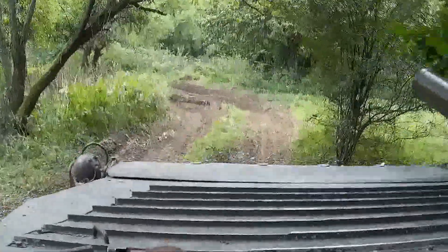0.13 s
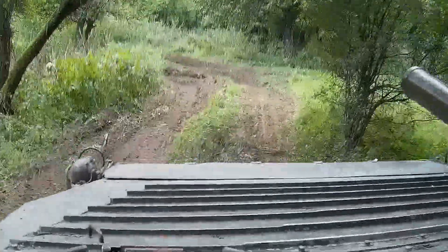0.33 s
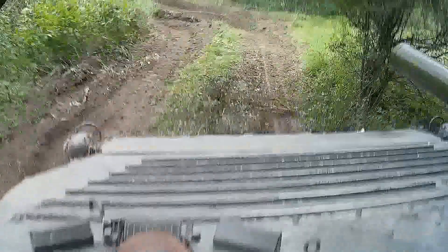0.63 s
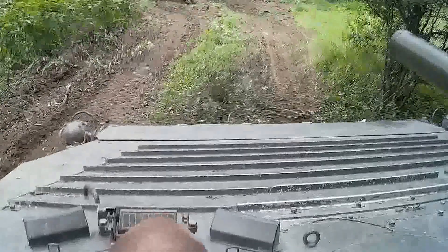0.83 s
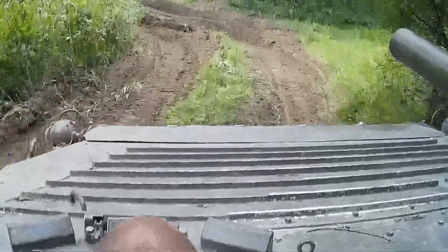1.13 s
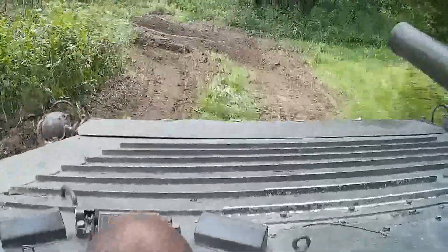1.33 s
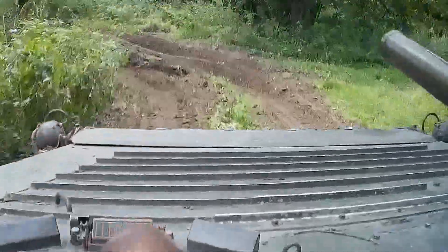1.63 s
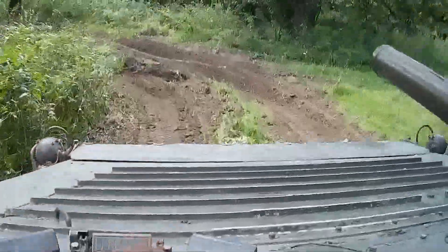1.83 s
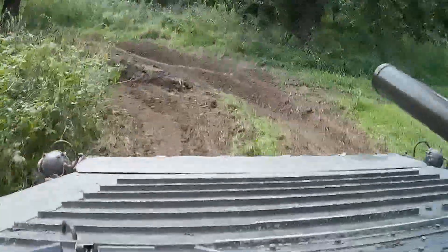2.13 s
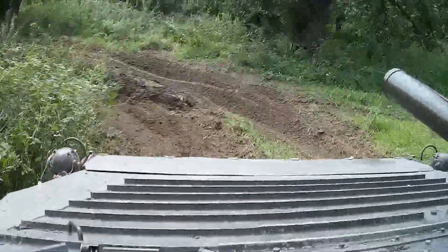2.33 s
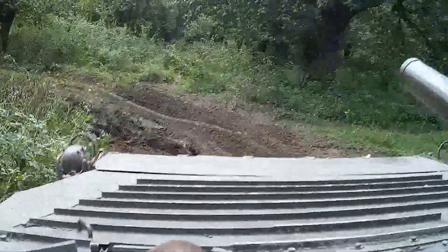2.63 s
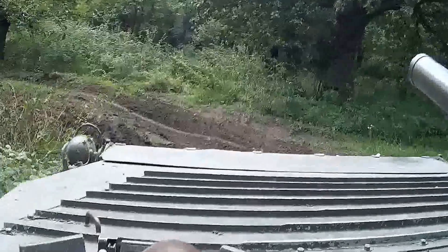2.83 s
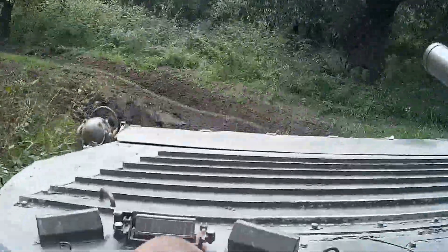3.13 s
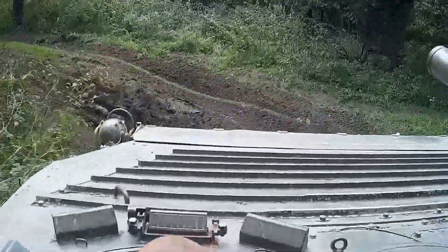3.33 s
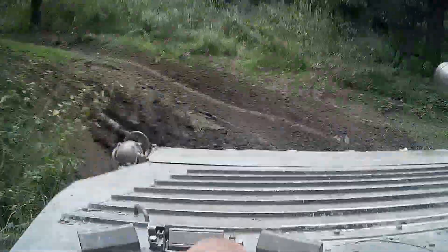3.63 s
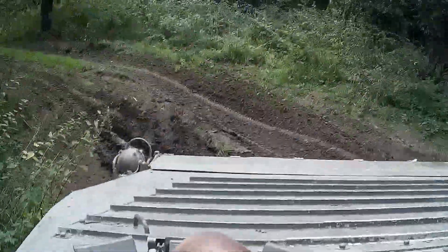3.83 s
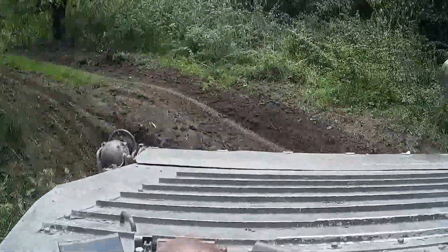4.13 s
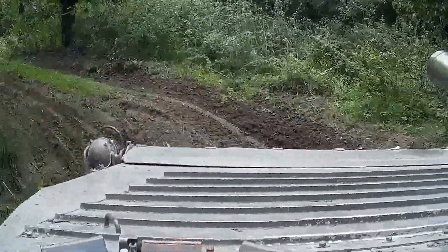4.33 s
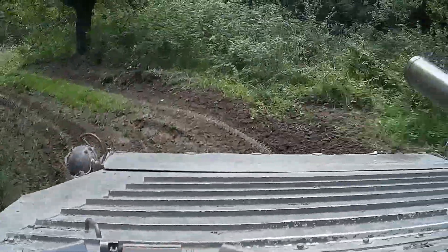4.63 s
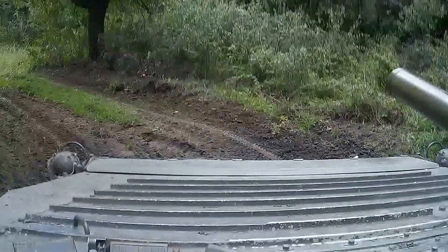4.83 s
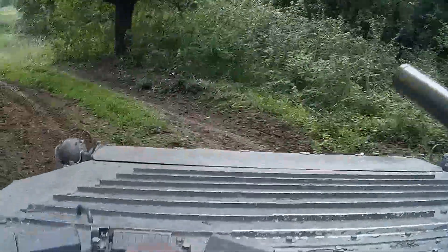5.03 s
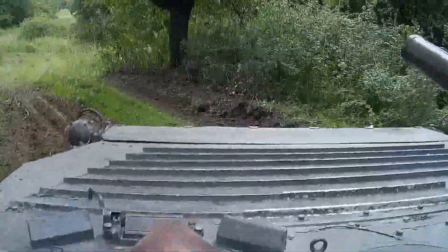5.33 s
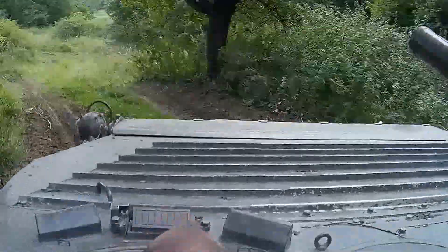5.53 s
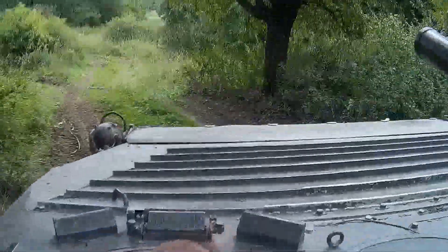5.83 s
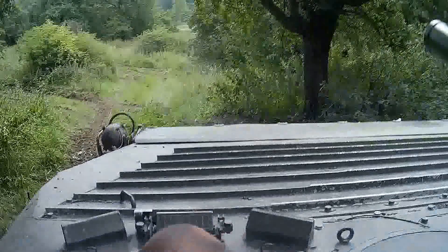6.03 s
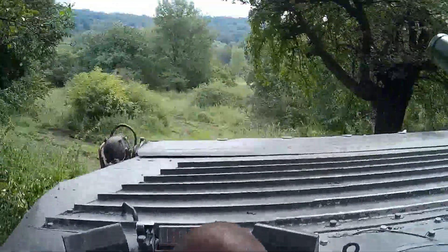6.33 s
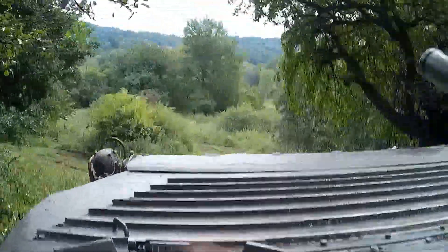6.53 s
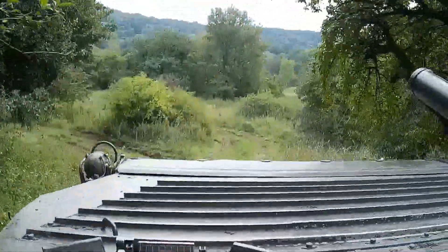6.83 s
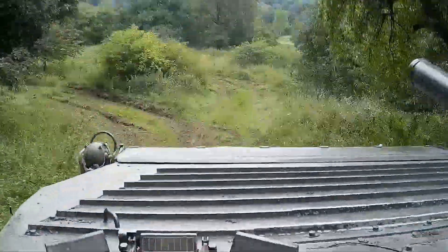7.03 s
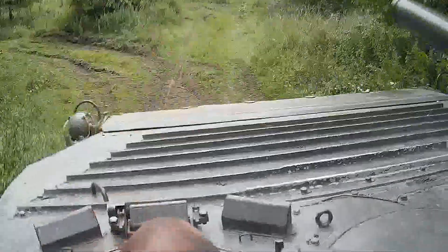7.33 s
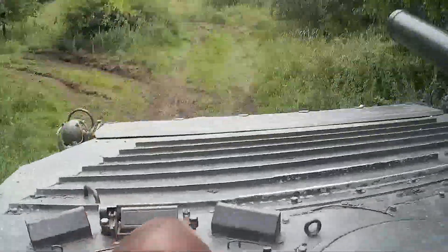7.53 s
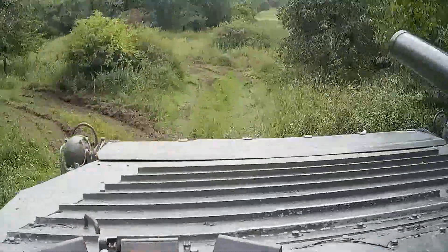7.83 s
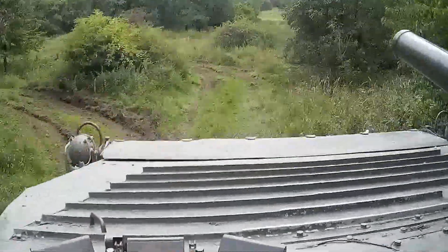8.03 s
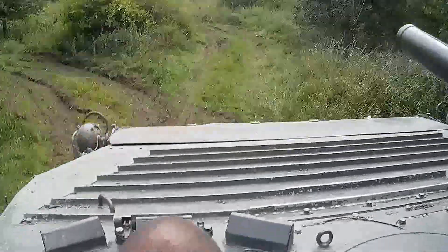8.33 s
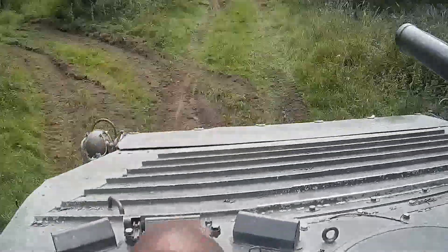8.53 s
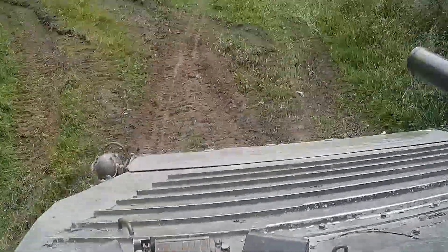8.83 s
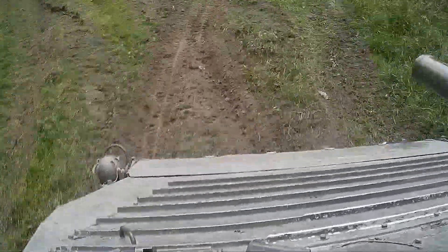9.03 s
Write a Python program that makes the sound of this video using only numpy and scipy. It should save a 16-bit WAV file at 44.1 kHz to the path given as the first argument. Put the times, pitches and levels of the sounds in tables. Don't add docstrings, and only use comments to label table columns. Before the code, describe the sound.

An outdoor ride with the microphone fixed on a heavy vehicle's steel hull. Steady diesel firing, plate drone and fast metallic chatter run throughout, with low track and wind rumble beneath. Bright metal ticks and a few dull knocks come irregularly. After the middle the loose metal slams in dense bursts; a big bump follows, then lighter rattling with clinks and repeated blunt thumps that briefly duck the sound.

```python
import sys
import numpy as np
from scipy import signal
from scipy.fft import rfft, irfft
from scipy.io import wavfile
from scipy.ndimage import uniform_filter1d

SR = 44100
rng = np.random.default_rng(int(sys.argv[2]) if len(sys.argv) > 2 else 0)


def output_pcm(signal):
    pcm = np.clip(np.atleast_2d(signal).T, -1, 1) * 32767
    wavfile.write(sys.argv[1], SR, np.round(pcm).astype(np.int16))


def invert_db(x):
    u = np.asarray(x, float) / 20
    return 10 ** u


N = 405279


def rms_one(x):
    return x / np.sqrt(np.mean(x ** 2) + 1e-20)


def in_time(rows):
    s, *columns = np.transpose(rows)
    return [np.interp(np.arange(N) / SR, s, c) for c in columns]


def spectrum_db(hz, rows):
    table_hz, table_db = np.transpose(rows)
    return np.interp(np.log(hz), np.log(table_hz), table_db)


def resonance_db(hz, centre_hz, width_hz, top_db):
    return top_db / (1 + (2 * (hz - centre_hz) / width_hz) ** 2)


def bump(s, ms):
    out = np.zeros(N)
    first, last = int((s - ms / 200) * SR), int((s + ms / 200) * SR)
    near = np.arange(max(first, 0), min(last, N))
    out[near] = np.exp(-.5 * ((near / SR - s) * 1000 / ms) ** 2)
    return out


def drift(rate_hz):
    step = 40
    r = np.exp(-2 * np.pi * step * rate_hz / SR)
    noise = rng.standard_normal(N // step + 2002)
    slow = signal.lfilter([1], [1, -2 * r, r * r], noise)[2000:]
    return np.interp(np.arange(N) / step, np.arange(len(slow)), rms_one(slow))


def colour(x, spectrum, peaks=()):
    size = 2 ** 15
    hz = np.maximum(np.arange(size // 2 + 1) * SR / size, 1)
    db = spectrum_db(hz, spectrum) + sum(resonance_db(hz, *peak) for peak in peaks)
    cepstrum = irfft(db * np.log(10) / 20, size)
    cepstrum[1:size // 2] *= 2
    cepstrum[size // 2 + 1:] = 0
    response = irfft(np.exp(rfft(cepstrum)), size)
    return rms_one(signal.fftconvolve(x, response)[:N])


def highpass(x, order, hz):
    return signal.sosfilt(signal.butter(order, hz, "high", fs=SR, output="sos"), x)


def ring(seconds, sizes, hz, t60_s):
    clicks = np.full(N, 1e-18)
    np.add.at(clicks, (seconds * SR).astype(int), sizes)
    r, w = invert_db(-60 / (t60_s * SR)), 2 * np.pi * hz / SR
    return signal.lfilter([0, np.sin(w)], [1, -2 * r * np.cos(w), r * r], clicks)


# time_s, turns_per_s
CRANK_SPEED = [(0.0, 28.23), (0.528, 27.89), (0.762, 31.83), (1.235, 35.38), (1.684, 30.44), (2.703, 31.66),
               (2.955, 27.1), (3.469, 27.41), (3.6, 32.3), (4.3, 30.75), (4.812, 30.67), (5.269, 36.05),
               (5.711, 32.43), (6.274, 36.11), (6.714, 26.25), (7.2, 24.61), (7.39, 30.9), (9.19, 32.48)]


def crank_speed():
    flywheel_s = .16
    return uniform_filter1d(in_time(CRANK_SPEED)[0], size=int(flywheel_s * SR), mode="nearest")


# start_s, length_s, sharpness_db
PULLS = [(0, 0.67, -30), (1.764, 0.21, -32.5), (2.787, 0.74, -31), (3.62, 0.55, -39), (4.227, 0.77, -29.5),
         (5.04, 0.34, -34.5), (5.513, 0.504, -30), (5.974, 0.6, -36), (6.423, 0.25, -29),
         (6.99, 0.4, -34.5), (7.5, 1.2, -42)]


def pulling():
    edge_s, coast_db = 0.039, -50.5
    t = np.arange(N) / SR

    def held(s, length_s):
        inside_s = np.minimum(t - s, s + length_s - t)
        return np.clip(inside_s / edge_s + .5, 0, 1)

    return coast_db + np.max([held(s, length_s) * (db - coast_db) for s, length_s, db in PULLS], axis=0)


# time_s, chatter_db
SHAKING = [(0, -36.5), (1.2, -35.5), (2.8, -38), (3.2, -36.5), (4.2, -37.5), (4.7, -32), (4.95, -30),
           (5.4, -34.5), (5.7, -24.5), (6.05, -31.5), (6.4, -32.5), (6.55, -23.5), (6.9, -27.5),
           (7.15, -25.5), (7.3, -34.5), (7.75, -35.5), (8.6, -41.5), (9.19, -33)]


def shaking():
    return in_time(SHAKING)[0]


# time_s, level_db
SWAY_LEVEL = [(0, -43), (1.3, -37.5), (3.7, -38), (5.4, -50), (6.7, -30.5), (7.5, -41.5), (8.1, -26),
              (8.75, -52), (9.19, -38)]
# time_s, level_db
RUMBLE_LEVEL = [(0, -26), (1.3, -30), (2.6, -26.5), (3.2, -31), (4, -22), (4.6, -29), (6.3, -22), (6.8, -28.5),
                (7.2, -31), (7.33, -12), (7.45, -30), (8.6, -30.5), (8.8, -25.5), (9.0, -30), (9.19, -25)]
# freq_hz, density_db_per_hz
SWAY_SPECTRUM = [(6, -46), (12, -10), (20, -12), (35, -4), (50, -1.5), (80, -37), (250, -57), (3000, -110)]
# freq_hz, density_db_per_hz
RUMBLE_SPECTRUM = [(24, -34), (40, -12.5), (64, -3), (91, -11), (123, -9), (156, -18.5), (450, -32),
                   (500, -54), (650, -72), (1100, -120)]
# freq_hz, width_hz, lift_db
TRACK_HUM = [(57.5, 11, 6)]


def running_gear():
    sway_db, = in_time(SWAY_LEVEL)
    track_db, = in_time(RUMBLE_LEVEL)
    sway = colour(rng.standard_normal(N) * invert_db(4 * drift(8)), SWAY_SPECTRUM)
    rumble = colour(rng.standard_normal(N) * invert_db(1.3 * drift(12.0)), RUMBLE_SPECTRUM, TRACK_HUM)
    rumble_db = track_db - 0.3 * (pulling() + 32.5) - 4.5
    return invert_db(sway_db + 5.5) * sway + invert_db(rumble_db) * rumble


# freq_hz, density_db_per_hz
SIZZLE_SPECTRUM = [(2500, -35), (3800, -3), (4600, 3), (6000, 12), (8000, -3), (9500, -7), (11000, -21),
                   (16000, -45)]
# freq_hz, width_hz, lift_db
SIZZLE_RINGS = [(3600, 500, 11), (5940, 370, -8)]


def sizzle():
    sizes = invert_db(1.5 * np.minimum(rng.exponential(1, N), 5))
    grains = sizes * rng.standard_normal(N) * invert_db(1.5 * drift(40))
    level_db = -39.5 + 1.92 * (shaking() + 31.5)
    return invert_db(level_db) * colour(grains, SIZZLE_SPECTRUM, SIZZLE_RINGS)


# start_s, peak_db, contact_sharpness_hz
KNOCKS = [(2.907, -20, 330), (2.9165, -22.5, 1000), (3.586, -22.5, 1100), (3.589, -24, 450),
          (3.654, -32, 900), (7.2292, -26.5, 2000), (7.2285, -17, 330), (8.3261, -30.5, 2200),
          (8.8, -27, 2200), (8.891, -25.5, 1510), (9.072, -26.5, 1000)]
# freq_hz, level_db, t60_s
KNOCK_MODES = [(215, -2, 0.023), (279, 0.5, 0.091), (327, 5.5, 0.03), (384, -2.5, .02), (470, 5, 0.0075),
               (603, -5, 0.01), (820, 12.5, 0.031), (1130, 5, 0.046), (1490, 19, 0.021), (1725, 15, 0.024),
               (2100, -4, .01)]


def knocks():
    s, db, contact_hz = np.transpose(KNOCKS)
    luck = rng.standard_normal((len(s), len(KNOCK_MODES)))
    out = np.zeros(N)
    for k, (hz, mode_db, t60_s) in enumerate(KNOCK_MODES):
        reach = np.minimum(3 * hz / contact_hz, 1) / (1 + (hz / contact_hz) ** 2)
        out -= ring(s, invert_db(db + mode_db - 3.5 + 0.65 * luck[:, k]) * reach, hz, t60_s)
    return out


# centre_s, level_db, width_ms, direction
JOLTS = [(.6, -16, 9.0, 1), (3.595, -14, 6.0, 1), (5.95, -13, 8.0, 1), (6.21, -15, 4.0, 1),
         (6.75, -14, 7.0, 1), (7.267, -4, 3.5, 1), (7.281, -7, 4.0, -1), (7.292, -4, 5.0, -1),
         (8.275, -18, 5.0, 1), (8.31, -12, 4.0, 1), (8.32, -14, 3.0, -1), (8.762, -7, 4.5, 1),
         (8.772, -9, 3.5, -1), (8.785, -16, 4.0, 1), (8.797, -5, 6.0, -1), (8.871, -6, 5.0, -1),
         (8.881, -7, 3.5, 1), (8.893, -4, 6.0, -1), (8.96, -15, 4.0, 1), (8.972, -7, 4.0, -1),
         (8.985, -9, 5.0, -1), (9.0705, 2, 2.8, 1), (9.084, -1, 5.0, -1), (9.136, -9, 4.0, 1),
         (9.146, -12, 5.0, -1)]


def jolts():
    push = sum(way * invert_db(db) * bump(s, ms) for s, db, ms, way in JOLTS)
    return highpass(push, 1, 8)


# start_s, peak_db
CRACKS = [(0.165, -33), (0.3207, -31), (0.6464, -22), (0.6744, -24), (3.1018, -32), (3.5848, -32),
          (3.6701, -23), (3.7065, -38), (4.2383, -26), (4.3326, -34), (4.4034, -35), (4.6974, -35),
          (6.0097, -32), (6.3086, -29), (6.6458, -24), (7.2275, -22), (7.816, -19), (7.8655, -35),
          (7.9773, -42), (8.1873, -44), (8.4906, -41), (8.8074, -32)]


def cracks():
    s, db = np.transpose(CRACKS)
    return highpass(ring(s, invert_db(db + 11.5), hz=11300, t60_s=0.0015), 2, 9000)


STOPS_HZ = [
    3680,
    4660,
    5030,
    5600,
]
# start_s, peak_db
FOOT_TICKS = [(.1165, -15), (.1605, -25), (.1962, -17), (.3215, -18), (.6753, -7.5), (3.074, -20),
              (3.1127, -13.5), (3.581, -30), (3.5838, -13), (3.6042, -17), (3.6441, -17), (4.4716, -18),
              (6.0023, -22), (6.1492, -19.5), (7.9232, -20), (8.0133, -28), (8.1199, -27), (8.2011, -18),
              (8.2846, -19), (8.4227, -24), (8.5351, -25), (8.7716, -20)]
SIDE_TICKS = [(.2346, -26), (2.465, -23), (3.0025, -25), (3.12, -15), (4.6981, -12), (6.309, -10),
              (6.3948, -18), (7.3094, -13.5), (7.424, -14.5), (7.8161, -6.5), (8.1383, -16.5),
              (8.1987, -20), (8.3603, -24), (8.808, -9.5), (9.086, -19), (0.2776, -25), (1.7578, -30),
              (1.9232, -30), (3.1292, -24), (3.6653, -26), (3.6967, -25), (5.314, -25), (4.545, -20),
              (4.638, -24.5), (4.6596, -28), (4.6745, -23), (4.82, -21), (4.9172, -29), (4.9476, -25),
              (4.4108, -29), (4.5253, -28), (3.5128, -40), (3.504, -28), (6.242, -26), (6.385, -27),
              (6.491, -18), (6.9053, -24), (7.7275, -24), (8.0932, -35), (7.8212, -21), (7.8805, -19),
              (8.3506, -22)]
FACE_TICKS = [(0.28, -25), (0.647, -10), (2.9464, -17.5), (3.1024, -17), (3.6482, -16), (3.6607, -11.5),
              (3.6709, -11.5), (3.707, -16), (4.239, -14), (4.333, -15), (4.7265, -19.5), (4.8713, -20),
              (4.878, -18.5), (6.011, -12.5), (6.2564, -17.5), (6.7835, -17), (7.277, -10), (7.3142, -16),
              (7.787, -24), (7.7947, -19.5), (7.8664, -10.5), (7.891, -25), (7.964, -20), (7.978, -12),
              (8.059, -15.5), (8.1547, -21), (8.188, -13.5), (8.2297, -21), (8.3364, -16), (8.4917, -11.5),
              (8.7104, -15.5)]
TIP_TICKS = [(.0061, -27.5), (0.0992, -21), (0.1295, -14.5), (0.166, -21), (0.2105, -24.5), (0.2542, -19),
             (0.2615, -21), (0.288, -14), (0.7765, -29), (1.2672, -25), (1.2771, -27), (1.2871, -23),
             (1.6784, -24), (2.3236, -25), (2.9656, -23), (4.2455, -18), (4.2724, -22), (4.296, -24),
             (4.3417, -24), (4.4041, -13.5), (5.6538, -16), (5.74, -13), (5.9695, -20), (6.0243, -13),
             (6.6227, -23), (8.3044, -25), (8.7992, -17), (8.8916, -28), (9.0756, -14.5)]
# freq_hz, level_db, t60_s
FITTING_MODES = [(3880, -6.5, 0.011), (4410, 0.5, 0.0048), (4700, -46, 0.013), (5273, -8, 0.016),
                 (5330, -7, 0.013), (6640, -4, 0.011), (7690, 4.5, 0.003), (8760, -1.5, 0.0065)]


def ticks():
    tables = FOOT_TICKS, SIDE_TICKS, FACE_TICKS, TIP_TICKS
    events = [(s, db, hz) for hz, rows in zip(STOPS_HZ, tables) for s, db in rows]
    s, db, stop_hz = np.transpose(events)
    luck = rng.standard_normal((len(s), len(FITTING_MODES) + 2))
    out = np.zeros(N)
    for k, (mode_hz, mode_db, t60_s) in enumerate(FITTING_MODES):
        near_db = -15 * np.abs(np.log2(mode_hz / stop_hz)) + 2.0 * luck[:, k]
        sizes = invert_db(db + mode_db + near_db + 9.0) * (-1) ** k
        out += ring(s + .00015 * np.abs(luck[:, k + 1]), sizes, mode_hz, t60_s)
        wobble_s = .0013 * (1 + .3 * np.tanh(luck[:, k]))
        out += ring(s + wobble_s, .35 * sizes * np.sign(luck[:, k + 1]), mode_hz, t60_s)
        out += ring(s + 0.0052, 0.14 * sizes, mode_hz, t60_s)
    out = signal.sosfilt(signal.butter(4, 10000, fs=SR, output="sos"), out)
    edge_db = db - 17.5 + 0.4 * (db + 11) + 1.5 * luck[:, -1]
    out += ring(s, invert_db(edge_db), 10040, 0.004)
    return highpass(out, 4, 3300)


# centre_s, length_s
CHANGEOVERS = [
    (.62, .2),
    (2.92, .3),
]


def beat(turns, sharpness, spread_db, second):
    luck = rng.standard_normal((400, 3))[np.floor(turns + .25).astype(int)]
    angle = 2 * np.pi * (turns + 0.012 * luck[:, 1])

    def lobe(a):
        return np.exp(sharpness * (np.cos(a + .1 * (np.cos(a) - 1)) - 1))

    t = np.arange(N) / SR
    changed = sum(np.clip((t - s) / length_s + .5, 0, 1) for s, length_s in CHANGEOVERS)
    other = np.abs((changed + 1) % 2 - 1)
    second = second * np.clip(1 + .35 * luck[:, 2], 0, 2)
    first_lobe = (1 - other + other * second) * lobe(angle)
    second_lobe = (other + (1 - other) * second) * lobe(angle + np.pi)
    return (first_lobe + second_lobe) * np.clip(1 + spread_db * luck[:, 0] / 10, 0, 2)


# freq_hz, density_db_per_hz
DRONE_SPECTRUM = [(200, 0), (350, -6), (550, -9.5), (1000, -9.5), (1400, -3), (2300, 3), (3200, -24),
                  (5000, -27.5), (9000, -59), (16000, -35)]
CHATTER_SPECTRUM = [(1200, -26.5), (2200, 2), (3200, -11), (4300, -11), (5500, 0), (7000, -9),
                    (9000, -13.5), (10500, -21), (13000, -27), (16500, -45)]
# freq_hz, width_hz, lift_db
PLATES = [(705.6, 21, 5), (799, 223, 7), (840, 54, 5.5), (1617, 40, 8), (1655, 30, 5), (1730, 68, 6),
          (1940, 171, -11), (2100, 37, -0.5), (2220, 99, 2), (2297, 240, -13.5), (2838, 38, -24),
          (3330, 220, 11.5), (3712, 510, 11), (4400, 830, -1.5), (4670, 670, -1.5), (5840, 140, 8.5),
          (3644, 105, 2), (2720, 210, 1.5), (2980, 120, 2), (7800, 500, 5), (8760, 670, 5)]
# centre_s, level_db
SLAMS = [(4.569, -15.5), (4.801, -13), (4.958, -11), (4.93, -17), (5.019, -26), (5.106, -28), (5.136, -24),
         (5.536, -25), (5.596, -21), (5.626, -18), (5.72, -21), (5.751, -9), (5.839, -23), (5.928, -31),
         (6.481, -21), (6.5415, -23), (6.577, -19), (6.725, -22), (6.8, -18), (6.84, -20), (6.878, -29),
         (6.955, -33), (7.077, -13), (7.113, -20), (7.152, -22), (5.567, -31), (5.688, -26), (5.779, -18),
         (5.809, -25), (5.87, -31), (5.9, -38), (6.648, -32), (6.686, -25), (6.917, -19), (6.996, -25),
         (7.036, -16), (7.192, -14), (7.227, -12)]
# centre_s, lift_db, width_ms
FLEXES = [(0.798, 1, 190), (3.05, 1, 290), (4.7, 1, 590), (5.48, 4.5, 52), (6.3, 1, 270), (7.1, 2, 62),
          (7.78, 3, 50), (8.55, 1.5, 68), (9.17, 4.5, 94)]


def hull(turns):
    chatter_db = shaking()
    drone_db = -33 + 0.18 * (chatter_db + 38.0) + 0.11 * (crank_speed() - 31)
    drone_db = drone_db + sum(db * bump(s, ms) for s, db, ms in FLEXES)
    depth_db = 14.5 + .1 * (chatter_db + 13.0)
    swell = beat(turns, sharpness=2.1 + .15 * (chatter_db + 34), spread_db=.7, second=.44)

    grain_sizes = invert_db(1.6 * np.minimum(rng.exponential(1, N), 4)) * rng.choice([-1, 1], N)
    grains = grain_sizes * (rng.random(N) < 9000 / SR)
    rattle = rms_one(grains) + .5 * rng.standard_normal(N)
    buzz = rattle * invert_db(depth_db * swell + .8 * drift(36))
    hum = rng.standard_normal(N) * invert_db(0.17 * depth_db * swell + 0.8 * drift(34))

    def even(x):
        return x / np.sqrt(uniform_filter1d(x ** 2, size=6000))

    slams = sum(invert_db(db - 2.5) * bump(s, ms=1.7) for s, db in SLAMS)
    strength = invert_db(chatter_db + 3.5) * even(buzz) + slams * rattle
    chatter = np.std(strength) * colour(strength, CHATTER_SPECTRUM, PLATES)
    chatter = chatter + invert_db(-3.0 + .8 * (chatter_db + 28)) * highpass(chatter, 2, 14000)
    return chatter + invert_db(drone_db + 1.0) * colour(even(hum), DRONE_SPECTRUM, PLATES)


# time_s, firing_db
EFFORT = [(0, -30), (.15, -29), (.45, -25.5), (.7, -36), (.95, -32), (1.3, -34), (1.6, -31), (2.2, -36),
          (2.6, -32), (3.0, -24), (3.45, -25), (3.75, -40), (4.5, -24), (6.2, -28), (6.6, -24), (7.15, -26),
          (7.4, -41), (9.19, -42)]
FIRING_OVERTONES_DB = [0, -5.5, -14, -22.5]
UNEVEN_ORDERS_DB = [-3, -1, -1, -6, -1, -9]
# freq_hz, lift_db
SILENCER = [(100, 4), (130, -1), (165, -3.5), (190, 1.5), (240, -1), (275, 4), (310, -5)]


def exhaust(turns):
    firing_db, = in_time(EFFORT)
    sharp_db, speed = pulling(), crank_speed()
    uneven_db = -43.5 + .4 * (speed - 30) + .6 * (firing_db + 20.5)

    def order(k, db):
        lag = np.arctan(2 * (k * speed - 148) / 26) + np.pi / 2
        level = invert_db(db + .8 * drift(6)) * np.sqrt(2)
        phase = 2 * np.pi * k * turns + np.pi - .3 * k - lag + .005 * k * k * drift(4)
        return level * np.cos(phase)

    out = order(2, firing_db)
    for k, db in zip(range(4, 12, 2), FIRING_OVERTONES_DB):
        out = out + order(k, sharp_db + db + spectrum_db(k * speed, SILENCER))
    for k, db in zip(range(1, 12, 2), UNEVEN_ORDERS_DB):
        pipe_db = resonance_db(k * speed, centre_hz=118, width_hz=45, top_db=14.0)
        out = out + order(k, uneven_db + db + pipe_db)
    return out


def scene():
    turns = .19 + np.cumsum(crank_speed()) / SR
    background = running_gear() + sizzle()
    hits = knocks() + jolts() + cracks() + ticks()
    return (background + hits + hull(turns) + exhaust(turns))[None]


def band_limit(x):
    return signal.sosfilt(signal.butter(12, 16500, fs=SR, output="sos"), x)


def record(dry):
    power = uniform_filter1d(dry[0] ** 2, size=700)
    over_db = np.maximum(10 * np.log10(power + 1e-9) + 17.8, 0)
    ramp_db = 40 * np.arange(N) / SR
    duck_db = uniform_filter1d(np.maximum.accumulate(0.71 * over_db + ramp_db) - ramp_db, size=300)
    late = np.arange(N) - 500
    x = np.interp(late, np.arange(N), invert_db(-duck_db)) * dry
    x = x / (1 + (x / .74) ** 8) ** .125
    x = signal.sosfilt(signal.cheby2(10, 45, 16350, fs=SR, output="sos"), x)
    return band_limit(x)


dry = scene()
out = record(dry)
output_pcm(out)
```